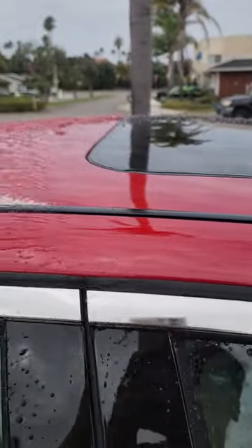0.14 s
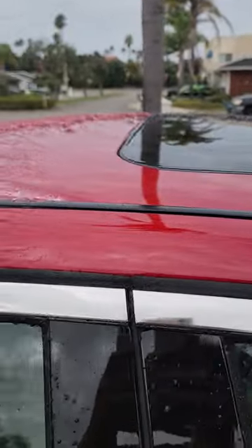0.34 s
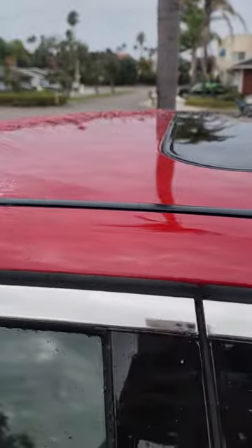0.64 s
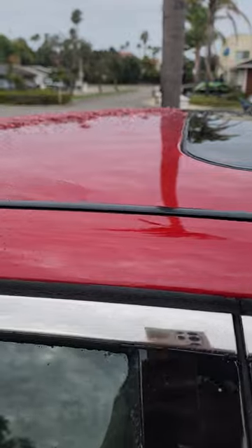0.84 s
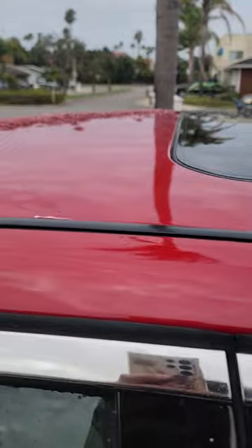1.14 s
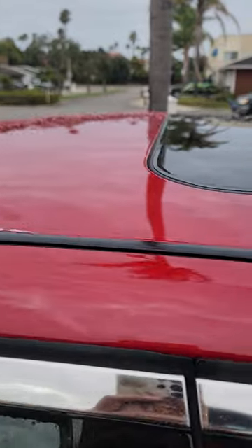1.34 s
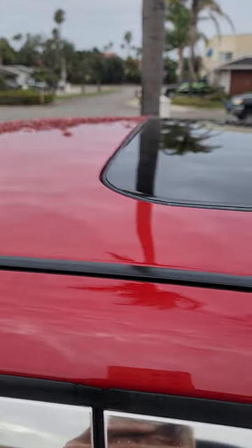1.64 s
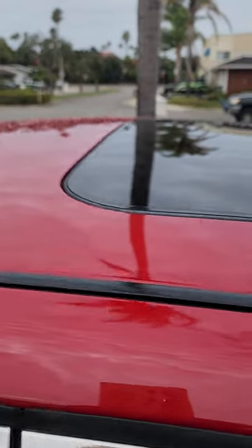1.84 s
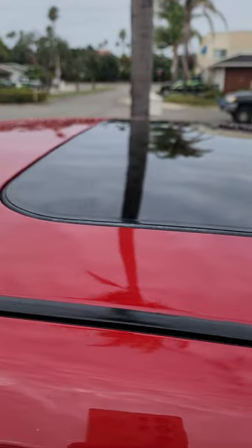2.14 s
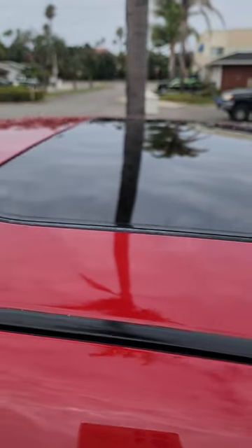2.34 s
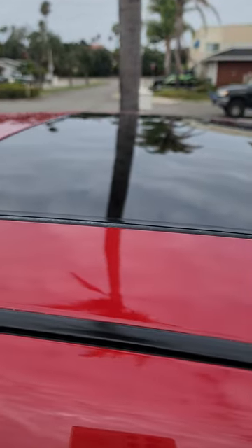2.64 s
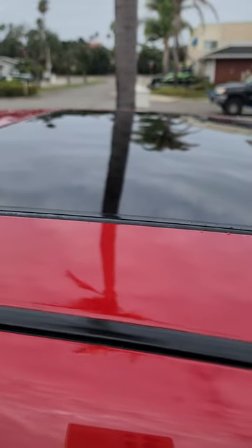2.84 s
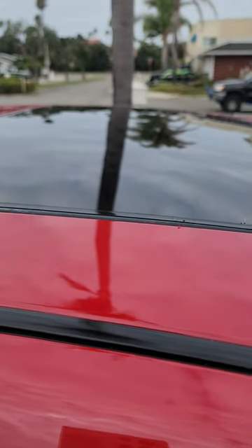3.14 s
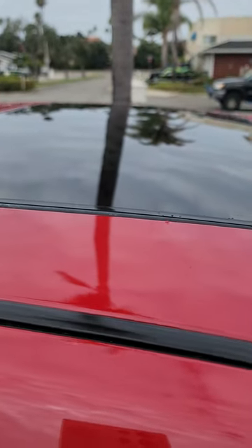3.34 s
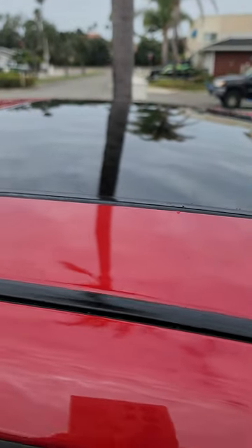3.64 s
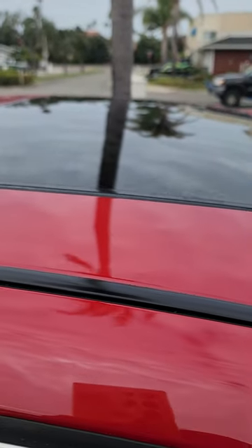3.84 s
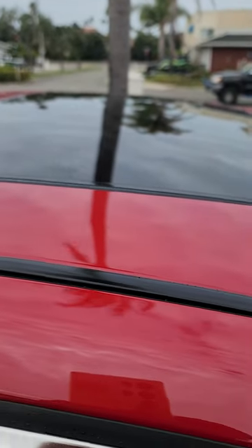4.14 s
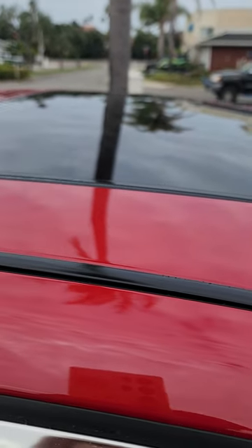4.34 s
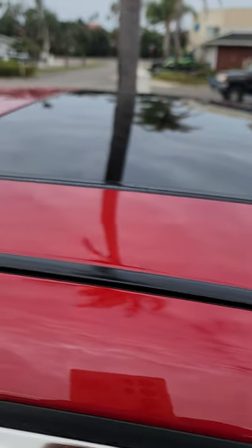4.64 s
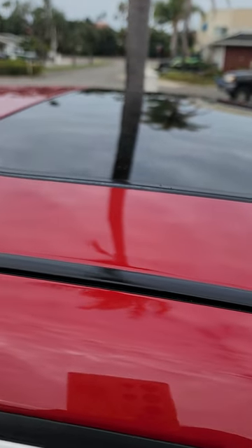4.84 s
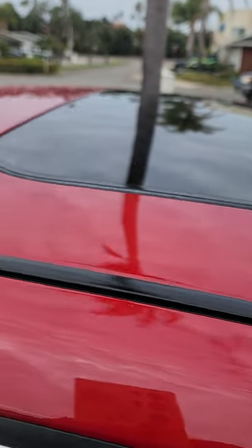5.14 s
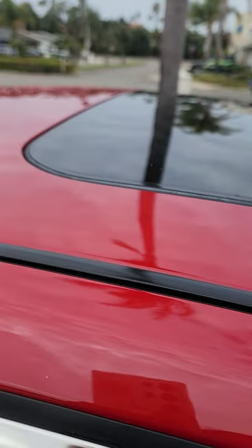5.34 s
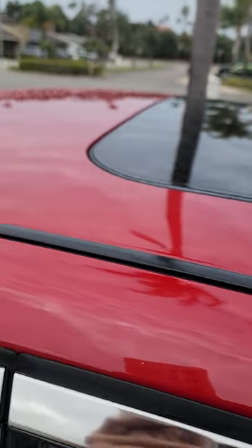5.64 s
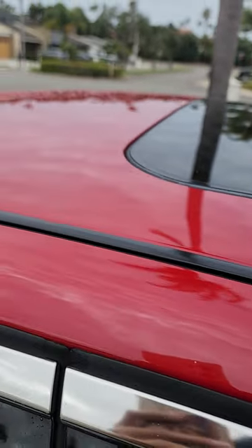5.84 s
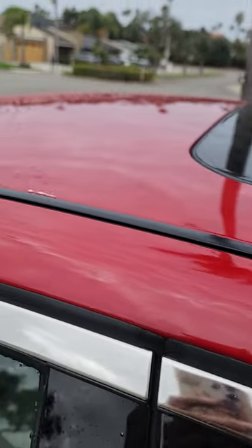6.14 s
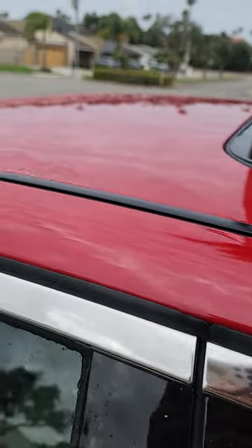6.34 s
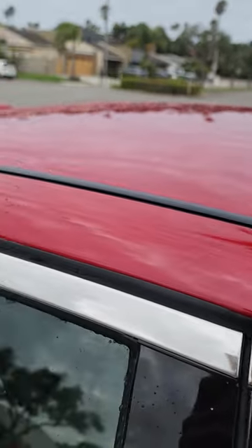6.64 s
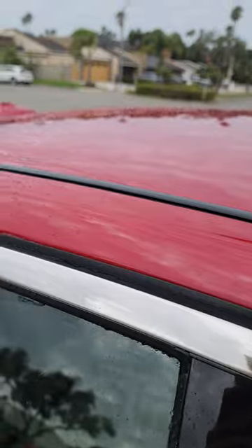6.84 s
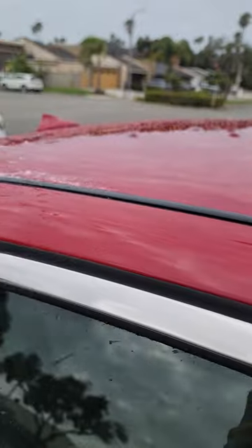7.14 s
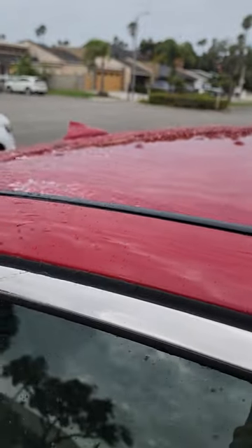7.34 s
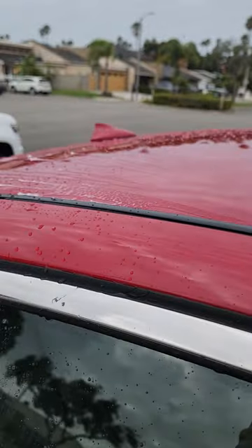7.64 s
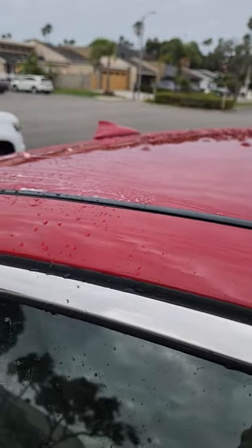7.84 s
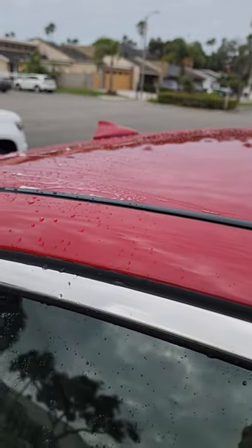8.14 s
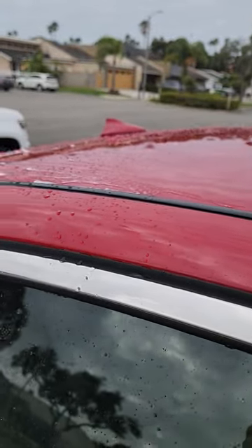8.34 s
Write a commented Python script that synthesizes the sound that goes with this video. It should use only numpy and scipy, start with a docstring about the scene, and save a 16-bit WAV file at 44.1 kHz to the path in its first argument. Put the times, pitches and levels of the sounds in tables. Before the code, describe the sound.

A running blower drones with a steady low hum and wavering whine while its nozzle sweeps a car roof. Loud hiss and watery flutter come first, then a quieter stretch, brighter blasts on drier metal, and a sharp airy whistle as the jet crosses a rail. Gusts thump the close stereo microphone in the open air; the blast dips near the end and returns.

```python
"""Air blower drying a wet car

The nozzle sweeps over a car roof outdoors, beside a hand-held camera with a two-port microphone.
Shaped noise makes the hissing jet, its louder strike on the panel, the rail groove's roar and the water's rush.
Noise ringing in narrow bands whistles and rasps at the rail; spilled air and breeze buffet the ports in low noise.
Behind it, sine lines at multiples of two shaft rates make the motor's hum and the turbine's whine."""
import sys
import numpy as np
from scipy.fft import rfft, irfft, next_fast_len
from scipy.io import wavfile
from scipy.ndimage import map_coordinates

SR = 44100
rng = np.random.default_rng(int(sys.argv[2]) if len(sys.argv) > 2 else 0)


def file_out(sig):
    """Save sig as 16-bit WAV at sys.argv[1]."""
    # one column per channel
    cols = np.atleast_2d(sig).T
    # limit, then scale
    lim = np.clip(cols, -1, 1)
    pcm = np.round(lim * 32767).astype(np.int16)
    wavfile.write(sys.argv[1], SR, pcm)


N = 374850
T = np.arange(N) / SR  # time of each sample, s


def amp(db):
    """Decibels to gain."""
    return np.exp(np.asarray(db) * (np.log(10) / 20))


def unit(x):
    """Scale to rms 1."""
    return x / np.sqrt(np.mean(x ** 2) + 1e-20)


def along(points, hz):
    """Join (Hz, value) points on a log frequency axis."""
    f, v = np.transpose(points)
    return np.interp(np.log(hz + 1), np.log(f + 1), v)


def curves(rows):
    """One curve over time for each column after the time column."""
    s, *columns = np.transpose(rows)
    return [np.interp(T, s, column) for column in columns]


def wobble(rate):
    """A smooth random curve around zero, with rate knots a second."""
    knots = rng.standard_normal(int(N * rate / SR) + 4)
    grid = np.arange(0, len(knots) - 1, 1 / 8)
    smooth = map_coordinates(knots, [grid])
    return np.interp(T * rate, grid, smooth)


def filtered(x, response):
    """Shape x by a response given as a function of frequency."""
    size = next_fast_len(N + 8192)
    hz = np.fft.rfftfreq(size, 1 / SR)
    return irfft(rfft(x, size) * response(hz), size)[..., :N]


def noise(spectrum):
    """Coloured mono noise of rms 1."""
    return unit(filtered(rng.standard_normal(N), lambda hz: amp(along(spectrum, hz))))


def diffuse(spectrum, alike):
    """Coloured stereo noise of rms 1 whose sides are partly alike: mid and side noise set the coherence."""
    def mid_side(hz):
        turn = np.arccos(np.clip(along(alike, hz), -1, 1)) / 2
        return amp(along(spectrum, hz)) * np.array([np.cos(turn), np.sin(turn)])

    mid, side = filtered(rng.standard_normal((2, N)), mid_side)
    return unit(np.array([mid + side, mid - side]))


def delayed(x, ms):
    """x heard over a path whose length changes."""
    return map_coordinates(x, [(T - ms / 1000) * SR], order=3, mode="mirror")


def resonance(pitch_hz, width_hz):
    """Noise of rms 1 ringing in one resonance, at half amplitude width_hz either side of a pitch that may move."""
    flutter = filtered(rng.standard_normal((2, N)), lambda hz: 1 / (1 + (hz / width_hz) ** 2))
    phase = 2 * np.pi * np.cumsum(pitch_hz * np.ones(N)) / SR
    return unit(flutter[0] * np.cos(phase) + flutter[1] * np.sin(phase))


FADE_DB = 20  # rise_s and fall_s are the times a sweep takes to change by this much


def sweep(start, hold, rise, fall):
    """Gain 0-1 of one sweep: rise, hold and fall, straight in dB."""
    before = (start - T) / max(rise, .01)
    after = (T - start - hold) / max(fall, .01)
    return amp(-FADE_DB * np.clip(np.maximum(before, after), 0, 6))


def sweeps(rows):
    """One gain curve for each event row."""
    return [amp(db) * sweep(start, hold, rise, fall) for start, hold, db, rise, fall, *_ in rows]


def together(gains):
    """Level in dB of unrelated air sounds that add in power."""
    return 10 * np.log10(sum(g ** 2 for g in gains))


def blend(gains, values):
    """A quality averaged by power, so it leans to the loudest sweep."""
    return sum(g ** 2 * v for g, v in zip(gains, values)) / sum(g ** 2 for g in gains)


# bearing of the nozzle: time_s, left_port_lead_ms
NOZZLE_BEARING = [(0, .103), (.85, .128), (1.1, .148), (1.65, .107), (2.5, .125), (3.4, .07), (3.65, .09),
                  (4.07, .141), (4.3, .125), (5, .078), (5.3, .103), (5.8, .11), (6.07, .108), (6.22, .134),
                  (6.37, .1), (6.55, .095), (6.82, .108), (7.05, .096), (7.4, .064), (7.7, .066), (8, .1),
                  (8.35, .082)]


def from_nozzle(x):
    """A sound at the nozzle reaches the left port first."""
    lead_ms, = curves(NOZZLE_BEARING)
    return np.array([x, delayed(x, lead_ms)])


# the open jet, louder as the nozzle comes nearer: time_s, level_db
JET_NEARNESS = [(0, -16.5), (.9, -22.5), (1.6, -21), (3.3, -18.5), (3.7, -16), (4.4, -21.5), (4.82, -21),
                (4.95, -16.5), (5.7, -21.5), (6.33, -17), (6.7, -20), (7.6, -19), (8.5, -16.5)]
# the nozzle turns away from the car: start_s, hold_s, dip_depth_db, rise_s, fall_s
TURNS_AWAY = [(0.97, 0.36, 4.5, 0.11, 0.27), (5.845, 0.16, 4, 0.015, 0.053),
              (7.736, 0.28, 12.5, 0.13, 0.86)]


def jet_level():
    """Level of the open jet in dB: its nearness, less the turns away from the car."""
    near_db, = curves(JET_NEARNESS)
    dips = [depth_db * sweep(start, hold, rise, fall) for start, hold, depth_db, rise, fall in TURNS_AWAY]
    return near_db - sum(dips)


# the jet strikes the roof (also played by roof_strike): start_s, hold_s, level_db, rise_s, fall_s, brightness_db
ROOF_STRIKES = [(0, 0.84, -12.5, .1, 0.16, -10), (1.553, 0.062, -25, 1, 0.7, 7),
                (3.684, 0.21, -15.5, 0.15, 0.18, 5.5), (3.95, 0.25, -15, 0.21, 0.23, 2.5),
                (4.437, 0.032, -23, .12, 0.067, 5), (4.978, 0.79, -16, 0.11, 0.086, 7.5),
                (6.101, 0.095, -14, 0.032, 0.15, 4), (6.46, 0.039, -10.5, 0.14, 0.25, -8),
                (6.581, 0.55, -16.5, .2, 0.15, -8), (7.218, .41, -15.5, 0.17, 0.094, -18),
                (8.354, 0.13, -13.5, 0.071, 0.43, -4.5)]
# spectrum of the open jet: frequency_hz, density_db (per Hz)
JET_SPECTRUM = [(150, -48), (400, -3.5), (700, 1.5), (1200, 5), (2000, 3), (2700, 1), (4000, 4.5),
                (6000, 0), (7600, 2.5), (8600, 0), (10000, -8), (11000, -1), (11700, 0.5), (15800, 2)]
# left-right likeness of far sound (shared by every source that names it): frequency_hz, coherence
FAR_LIKENESS = [(100, 1), (300, 0.75), (640, 0.48), (1400, 0.22), (3000, 0.019), (15000, .05)]
JET_FOCUS = .87  # share of power added to the straight sound when the jet is aimed at the roof


def open_jet(level_db):
    """Broad turbulent hiss, scattered by the car and the street; more arrives straight when aimed at the roof."""
    strikes = sweeps(ROOF_STRIKES)
    straight = .045 + blend(strikes + [amp(level_db)], [JET_FOCUS] * len(strikes) + [0])
    scattered_air = np.sqrt(1 - straight) * diffuse(JET_SPECTRUM, FAR_LIKENESS)
    straight_air = np.sqrt(straight) * from_nozzle(noise(JET_SPECTRUM))
    # the left port is a little duller than the right
    side = np.array([[1], [-1]])
    shaded = filtered(scattered_air + straight_air,
                      lambda hz: amp(side * along([(4000, -0.66), (13000, -1.5)], hz)))
    return amp(level_db + 0.46 * wobble(21)) * shaded


# the jet's reflection in the roof: time_s, extra_path_ms
ROOF_REFLECTION = [(0, 1.45), (.5, 1.35), (.9, 1.18), (3.7, 1.22), (4.05, 1.3), (4.9, .95), (5.3, 1.16),
                   (6.1, 1.17), (6.85, 1.4), (7.7, 1.2), (8.5, 1.25)]
# weak reflections from the curved panels: path_ratio (to the roof's extra path), level_db (before colour)
PANEL_REFLECTIONS = [(.62, -22), (.85, -21), (1.25, -22)]
# reflections from the hand and the rail beside the right port: extra_path_ms, level_db (before colour)
NEAR_REFLECTIONS = [(.69, -19), (.96, -13)]
# colour of all the echoes, weak around 5 kHz, stronger from 6 to 9 kHz: frequency_hz, gain_db
REFLECTION_COLOUR = [(3000, 2), (4400, -9), (5500, -9), (6200, 4.5), (9000, 4), (14000, 2)]
ROOF_ECHO_DB, ECHO_DRIFT_MS = -13, .05  # roof echo before colour; scale of each panel echo's random drift


def off_roof(pair):
    """Several weak reflections colour the hiss with ripples that glide as the nozzle moves."""
    path_ms, = curves(ROOF_REFLECTION)

    def panels(x):
        return sum(amp(db) * delayed(x, ratio * path_ms + ECHO_DRIFT_MS * wobble(2.2))
                   for ratio, db in PANEL_REFLECTIONS)

    left, right = [amp(ROOF_ECHO_DB) * delayed(x, path_ms) + panels(x) for x in pair]
    near = sum(amp(db) * delayed(pair[1], ms + .015 * wobble(1.5)) for ms, db in NEAR_REFLECTIONS)
    echoes = filtered(np.array([left, right + near]), lambda hz: amp(along(REFLECTION_COLOUR, hz)))
    return np.array([unit(x) for x in pair + echoes])


# spectrum of the strike: frequency_hz, density_db (per Hz)
STRIKE_SPECTRUM = [(900, -51), (2500, -16), (3700, -2.5), (4300, 2), (5300, 1.5), (6700, 3.5), (7500, 3.5),
                   (8400, 3), (9000, -3), (10200, -4.5), (11600, 0), (13000, -0.5), (15800, -6)]
# the jet's fringe always brushes the paint: level against the open jet, brightness
GRAZE_DB, GRAZE_BRIGHT_DB = -14, -15


def roof_strike(jet_db):
    """Where the jet hits the panel it makes a compact hiss, brighter on dry paint."""
    gains = sweeps(ROOF_STRIKES) + [amp(jet_db + GRAZE_DB)]
    level_db = together(gains)
    bright_db = blend(gains, [row[-1] for row in ROOF_STRIKES] + [GRAZE_BRIGHT_DB])
    direct = off_roof(from_nozzle(noise(STRIKE_SPECTRUM)))
    # scattered share of the strike: strong near 3.6 kHz, least near 5.4 kHz, strong again at the top
    scatter_colour = [(3600, -3), (4300, -16), (5400, -24), (6500, -8), (10000, -2.5)]
    scatter = filtered(diffuse(STRIKE_SPECTRUM, FAR_LIKENESS), lambda hz: amp(along(scatter_colour, hz)))
    air = unit(direct + scatter)
    # a brighter jet also spreads wider on both sides of its peak
    skirt_share = [(3000, 0.79), (4300, 0.47), (6500, 0.048), (8000, 0.16), (11500, 0.55), (15500, .85)]
    skirts = filtered(air, lambda hz: along(skirt_share, hz))
    sputter_db = 1.4 * wobble(11) + 0.53 * wobble(300)  # drops torn off in the stream
    return amp(level_db + sputter_db) * (air + (amp(bright_db) - 1) * skirts)


# the jet runs in the rail's groove (also played by edge_whistle):
# start_s, hold_s, level_db, rise_s, fall_s, whistle_pitch_hz
GROOVE_PASSES = [(0, 0.83, -20, .1, 0.55, 2070), (1.01, 0.058, -24.5, 0.13, 0.19, 1940),
                 (3.679, 0.071, -30.5, 0.46, 0.16, 1900), (4.004, 0.077, -29.5, 0.12, 0.24, 2130),
                 (4.937, 0.045, -26.5, 0.08, 0.24, 1850), (6.252, 0.207, -17.5, 0.085, 0.45, 2000),
                 (6.551, .55, -20, .3, 0.192, 1890), (7.2, 0.47, -20, 0.21, .21, 2060),
                 (8.275, 0.25, -19.5, 0.045, 0.12, 2060)]
GROOVE_LEAK_DB = -20  # roar stirred by the jet's fringe, against the open jet
# spectrum of the groove's roar: frequency_hz, density_db (per Hz)
GROOVE_SPECTRUM = [(500, -32), (950, -6.5), (1150, -6), (1400, -4), (1750, 0.5), (1980, -0.5), (2250, 0),
                   (2550, -6.5), (3100, -11.5), (5000, -62)]


def rail_roar(jet_db):
    """The groove along the rail resonates like a badly blown pipe: a broad band of noise."""
    level_db = together(sweeps(GROOVE_PASSES) + [amp(jet_db + GROOVE_LEAK_DB)])
    direct = from_nozzle(noise(GROOVE_SPECTRUM))
    air = unit(direct + amp(-8.5) * diffuse(GROOVE_SPECTRUM, FAR_LIKENESS))
    return amp(level_db + 1.0 * wobble(25)) * air


# the jet crosses the groove's edge and whistles: start_s, hold_s, level_db, rise_s, fall_s, pitch_hz
EDGE_CROSSINGS = [(0.764, 0.094, -27, .3, .2, 1817), (1.033, 0.1098, -20.5, .25, 0.1237, 1940),
                  (1.5, 0.08, -32, 1.1, .6, 1947), (3.994, 0.05, -27, 0.076, .2, 2040),
                  (6.262, 0.0497, -14.5, .08, .28, 2018), (7.717, 0.043, -24.5, 0.197, 0.085, 2008),
                  (8.293, 0.069, -19.5, 0.051, 0.29, 1972)]
SING_DB = -6.5  # whistle while the jet stays in the groove, against the groove passes
WHISTLE_STRAY_HZ = 30  # scale of the pitch's random straying as the hand trembles


def edge_whistle(width_hz):
    """Turbulence drives one resonance of the groove, and its pitch follows the jet's angle."""
    gains = sweeps(EDGE_CROSSINGS) + [amp(SING_DB) * g for g in sweeps(GROOVE_PASSES)]
    level_db = together(gains)
    pitch_hz = blend(gains, [row[-1] for row in EDGE_CROSSINGS + GROOVE_PASSES])
    stray_hz = WHISTLE_STRAY_HZ * wobble(9)
    return amp(level_db) * from_nozzle(resonance(pitch_hz + stray_hz, width_hz))


# the jet drives water off a wet patch: start_s, hold_s, level_db, rise_s, fall_s
WATER_PATCHES = [(0, 0.7, -21, .1, 0.58), (3.1, 0.65, -32.5, 1.6, 1), (4.95, 0.034, -42, 0.13, .25),
                 (6.85, 0.53, -26, 0.84, 0.4), (8.3, 0.18, -36, 0.29, 0.28)]
MIST_DB = -19  # the thin film elsewhere, against the open jet
# spectrum of the water's rush: frequency_hz, density_db (per Hz)
WASH_SPECTRUM = [(35, -40), (90, -9), (190, 3), (300, 2), (420, 3), (550, -2), (780, 5.5), (1000, -1),
                 (1300, -14), (2200, -21)]


def water_wash(jet_db):
    """The film of water flutters under the jet with a low rush."""
    level_db = together(sweeps(WATER_PATCHES) + [amp(jet_db + MIST_DB)])
    direct = from_nozzle(noise(WASH_SPECTRUM))
    air = unit(direct + amp(-12) * diffuse(WASH_SPECTRUM, FAR_LIKENESS))
    return amp(level_db + 1.8 * wobble(30)) * air


# spilled air reaches the microphone: start_s, hold_s, level_db, rise_s, fall_s
SPILL_GUSTS = [(.26, 0.045, -23, .1, .08), (.72, 0.39, -32, 0.19, .3), (5.36, 0.026, -19, 0.072, .15),
               (5.52, 0.047, -23.5, 0.087, 0.18), (5.67, 0.09, -28.5, .08, .2), (5.88, .04, -26, .1, 0.22),
               (6.05, 0.037, -23, 0.13, 0.13), (6.225, 0.027, -17.5, 0.054, 0.17),
               (6.32, 0.074, -18.5, 0.078, 0.14), (6.5, 0.099, -18, 0.091, 0.13),
               (6.655, 0.022, -21.5, 0.049, 0.17), (6.97, 0.075, -25, 0.27, 0.25),
               (7.2, 0.021, -21, 0.13, .15), (7.42, 0.38, -25, 0.17, 0.4), (8.27, 0.13, -25, 0.048, 0.47)]
DRAUGHT_DB = -20  # spill between gusts, against the open jet


def spill_level(jet_db):
    """Level in dB of spilled air: gusts over a draught that follows the jet."""
    return together(sweeps(SPILL_GUSTS) + [amp(jet_db + DRAUGHT_DB)])


# spectrum of the buffeting: frequency_hz, density_db (per Hz)
BUFFET_SPECTRUM = [(15, -22), (35, -1), (70, 4), (130, 4), (200, -3.5), (300, -7.5), (600, -32)]


def buffeting(level_db):
    """Eddies of spilled air hit each port differently, in lumps partly shared by both."""
    own_lumps = np.array([wobble(16), wobble(16)])
    lumps = amp(2.2 * wobble(26) + 1.8 * own_lumps)
    air = diffuse(BUFFET_SPECTRUM, [(30, 0.71), (80, 0.47), (300, 0.22)])
    return amp(level_db) * unit(lumps * air)


# spectrum of the breeze's rumble: frequency_hz, density_db (per Hz)
BREEZE_SPECTRUM = [(12, -15), (28, -15), (45, -1), (65, 3), (100, -38), (200, -22)]
# rumble at the jet's mean level; dB gained per dB of jet; share of the gusts, against the spill
BREEZE_DB, BREEZE_GROWS, BREEZE_GUST_DB = -38.5, 2.3, -19


def breeze(jet_db, spill_db):
    """Slow eddies stirred by the jet press on both ports nearly together."""
    stirred_db = BREEZE_DB + BREEZE_GROWS * (jet_db - jet_db.mean())
    level_db = together([amp(stirred_db), amp(spill_db + BREEZE_GUST_DB)])
    return amp(level_db) * diffuse(BREEZE_SPECTRUM, [(30, 0.95), (100, 0.65)])


def shaft(rate_hz, orders, drift, waver_db):
    """Sine lines at multiples of a slightly unsteady rotation, each wavering in level on its own."""
    speed = 1 + drift * (wobble(1.502) + .5 * wobble(12))
    turns = np.cumsum(rate_hz * speed) / SR
    lines = [amp(db + waver_db * wobble(3.95)) * np.sin(2 * np.pi * (round(k) * turns + rng.random()))
             for k, db in orders]
    return np.sqrt(2) * sum(lines)


TURBINE_HZ = 503.5  # mean rotation rate
# turbine lines, levels before the gains below: rate_multiple, level_db
TURBINE_ROOT_LINE = [(1, -43)]
TURBINE_OVERTONES = [(2, -44.5), (3, -50), (4, -52.5)]
TURBINE_BLADE_LINE = [(9, -51.5)]
# the whine swells and fades with the camera's position: time_s, root_gain_db, overtones_gain_db
WHINE_GAINS = [(0, 9, 8), (1.15, -2, -2), (1.8, 3, -7), (2.1, -3, -14), (2.7, 4, 7), (3.7, 3, 2.5),
               (4.7, 0, 2), (5.3, -0.5, -3), (5.95, 4.5, 1.5), (6.3, 4, -2), (6.65, -6, 5), (7.2, 8.5, 8),
               (7.7, -1.5, -7), (8.2, 5.5, 0)]
# the thin blade tone comes and goes with position: time_s, gain_db
BLADE_GAIN = [(0, -6), (1.9, -1), (2.6, 0), (3.6, 6), (4.3, -3), (4.8, 4), (5.3, 9), (7.8, -8), (8, 8),
              (8.2, 3), (8.5, -3)]


def turbine():
    """The turbine's whine: its low lines and its thin blade tone swell and fade as the camera moves."""
    root_db, overtones_db = curves(WHINE_GAINS)
    blade_db, = curves(BLADE_GAIN)
    root = amp(root_db) * shaft(TURBINE_HZ, TURBINE_ROOT_LINE, drift=.0012, waver_db=.8)
    overtones = amp(overtones_db) * shaft(TURBINE_HZ, TURBINE_OVERTONES, drift=.0009, waver_db=1)
    blades = amp(blade_db) * shaft(TURBINE_HZ, TURBINE_BLADE_LINE, drift=.0008, waver_db=2)
    return root + overtones + blades


MOTOR_HZ = 28.35  # mean cycle rate
# motor lines from middle, lowest (a throb), upper, standing-wave and next order, levels before the gains below:
# rate_multiple, level_db
HUM_LINES = [(5, -31), (6, -38), (7, -45)]
THROB_LINES = [(2, -39), (3, -41.5), (4, -42)]
DRONE_LINES = [(10, -41), (11, -49.5), (12, -58)]
STANDING_LINE = [(8, -35.5)]
NEIGHBOUR_LINE = [(9, -40.5)]
# standing wave of the hum's strongest upper order: time_s, extra_gain_db
STANDING_GAIN = [(0, 2.5), (1.3, 2.5), (2.2, 3), (2.8, -6), (3.4, -9), (3.72, -10), (4.35, -3), (5.3, 0.5),
                 (6.3, 2.5), (7.1, 2.5), (7.5, 5.5), (8.5, 3.5)]
NEIGHBOUR_SWELL = 0.57  # dB the next order gains per dB that the standing order loses
# the machine as the camera moves about: time_s, gain_db, upper_orders_extra_db, lowest_orders_extra_db
MACHINE_GAINS = [(0, 1, 1, -8), (1.5, -.5, -1, 1), (2.5, -1, 4, 0.5), (3.6, 0, -0.5, 2),
                 (4.6, 0.5, 3.5, -1), (5.4, -2, 0.5, -4), (5.95, 1.5, 3, 0), (6.4, -2, -4, 3),
                 (7.2, -3, -7, 3), (8.05, -4, 1, -10), (8.5, -3.5, -8, 0)]
# spectrum of the housing's rumble: frequency_hz, density_db (per Hz)
HOUSING_SPECTRUM = [(20, -30), (50, -3), (90, 2.5), (130, 3), (260, 2), (380, -1.5), (520, -4), (800, -8.5),
                    (2000, -42)]


def machine():
    """Motor hum, turbine whine and the rumble of their housing."""
    gain_db, upper_db, low_db = curves(MACHINE_GAINS)
    standing_db, = curves(STANDING_GAIN)
    neighbour_db = -NEIGHBOUR_SWELL * standing_db
    hum = shaft(MOTOR_HZ, HUM_LINES, drift=.0012, waver_db=.7)
    throb = amp(low_db) * shaft(MOTOR_HZ, THROB_LINES, drift=.002, waver_db=1.5)
    standing = amp(standing_db) * shaft(MOTOR_HZ, STANDING_LINE, drift=.0012, waver_db=.5)
    neighbour = amp(neighbour_db) * shaft(MOTOR_HZ, NEIGHBOUR_LINE, drift=.0015, waver_db=1)
    drone = amp(upper_db) * shaft(MOTOR_HZ, DRONE_LINES, drift=.0015, waver_db=1.3)
    motor = hum + throb + standing + neighbour + drone
    rumble = amp(-29.5) * diffuse(HOUSING_SPECTRUM, FAR_LIKENESS)
    return amp(gain_db) * (motor + turbine() + rumble)


# the jet breaks over the rail (also played by rail_rasp): start_s, hold_s, rasp_level_db
RAIL_BREAKS = [(0.892, 0.073, -22.5), (3.964, .026, -32), (6.316, 0.12, -23), (7.632, 0.06, -24.5),
               (8.314, 0.093, -23.5)]
# colour of the hiss on the rail: frequency_hz, gain_db
RAIL_TINT = [(1500, -3), (3300, 5.5), (5000, 0.5), (7500, 2), (12000, 0)]
RAIL_FADE_S = 0.042  # time for the colour to come and go


def on_rail(hiss):
    """On the rail the jet sheds larger eddies: the hiss leans to the upper middle, around 3 kHz."""
    share = np.max([sweep(start, hold, RAIL_FADE_S, RAIL_FADE_S) for start, hold, _ in RAIL_BREAKS], axis=0)
    tinted = filtered(hiss, lambda hz: amp(along(RAIL_TINT, hz)))
    return (1 - share) * hiss + share * tinted


RASP_HZ, RASP_WIDTH_HZ, RASP_FADE_S = 2520, 470, 0.11  # pitch, half width, time to come and go


def rail_rasp():
    """Breaking over the rail, the jet briefly wakes a broader, higher resonance."""
    gain = sum(amp(db) * sweep(start, hold, RASP_FADE_S, RASP_FADE_S) for start, hold, db in RAIL_BREAKS)
    return gain * from_nozzle(resonance(RASP_HZ, RASP_WIDTH_HZ))


def scene():
    """All the air sounds, led by the jet and its sweeps, over the running machine."""
    jet_db = jet_level()
    spill_db = spill_level(jet_db)
    hiss = on_rail(open_jet(jet_db) + roof_strike(jet_db))
    groove = rail_roar(jet_db) + edge_whistle(width_hz=95) + rail_rasp()
    nozzle = hiss + groove + water_wash(jet_db)
    return nozzle + buffeting(spill_db) + breeze(jet_db, spill_db) + machine()


def bells(rows, hz):
    """Gain in dB of bell-shaped peaks and dips."""
    return sum(db * np.exp(-((hz - centre_hz) / width_hz) ** 2) for centre_hz, width_hz, db in rows)


# the two ports' own colours: frequency_hz, left_minus_right_db
PORT_COLOUR = [(100, 1), (400, 0), (720, 5), (1000, -2), (1400, 7.5), (1800, 2), (2800, 4), (3600, 3),
               (4400, -1), (6200, 4), (7700, -4), (9700, 5.5), (11800, -3.5), (15800, -1.5)]
# the ports' own timing, shifted around their resonances: frequency_hz, left_port_lead_rad
PORT_TIMING = [(300, 0), (900, -.35), (1200, .2), (1700, -.35), (2600, -.1), (3200, 1.1), (3600, .8),
               (4000, -.45), (4600, -.35), (5400, 0), (7000, 0), (7800, .4), (8500, 1.4), (9100, 2),
               (9700, 1), (10500, .2), (11600, 0), (13000, -.6), (15800, 0)]
# narrow resonances and dips of each port's cavity: centre_hz, half_width_hz, gain_db
LEFT_PORT_CAVITY = [(1060, 110, 0), (3930, 160, -0.5), (5700, 300, 1), (7040, 180, -1.5), (7500, 250, 2.5)]
RIGHT_PORT_CAVITY = [(1100, 50, 1.9), (1280, 120, 0), (1510, 63, 2.5), (2420, 150, -1.5), (2800, 240, 1.6),
                     (3610, 490, -3.5), (5400, 140, 4.7), (6250, 200, 4), (6950, 160, 2)]
TOP_HZ = 15850  # band limit


def record(dry):
    """Each port colours and delays the sound its own way; peaks are rounded, then the top is cut off."""
    half = np.array([[.5], [-.5]])  # each port takes half of the difference
    x = filtered(dry, lambda hz: amp(half * along(PORT_COLOUR, hz)) * np.exp(1j * half * along(PORT_TIMING, hz)))
    x = filtered(x, lambda hz: amp([bells(LEFT_PORT_CAVITY, hz), bells(RIGHT_PORT_CAVITY, hz)]))
    rounded = x / (1 + np.abs(x / .95) ** 8) ** (1 / 8)
    return filtered(rounded, lambda hz: hz < TOP_HZ)


dry = scene()
out = record(dry)
file_out(out)
```